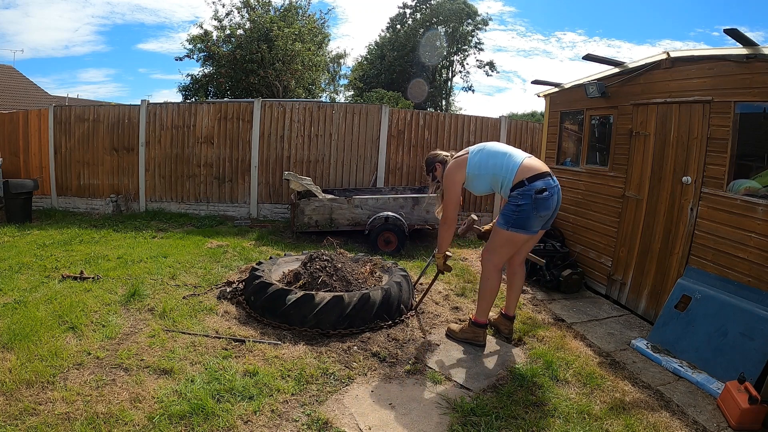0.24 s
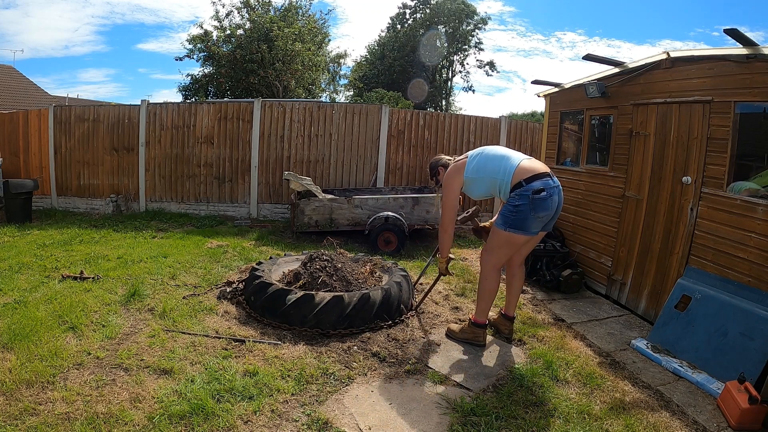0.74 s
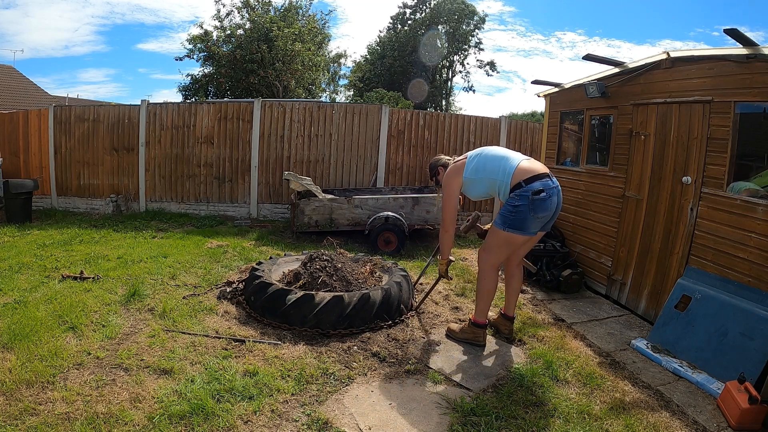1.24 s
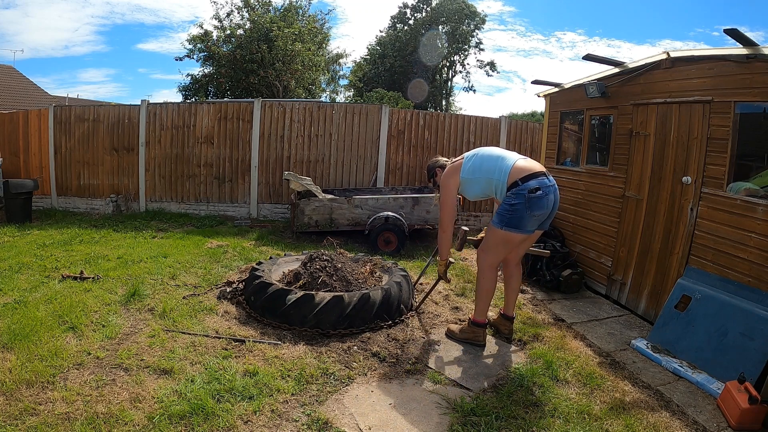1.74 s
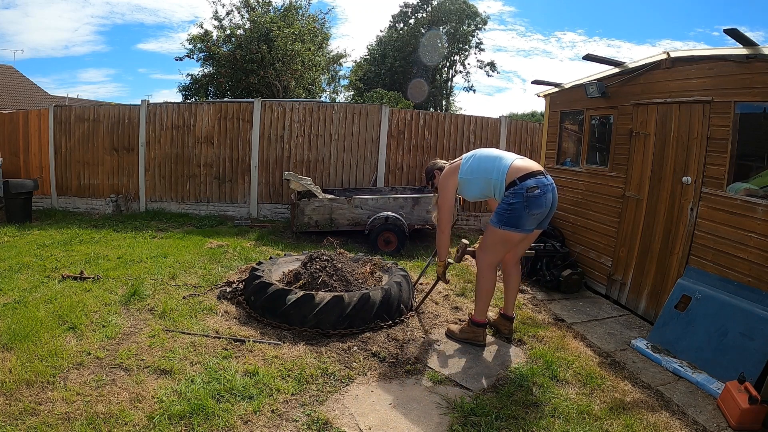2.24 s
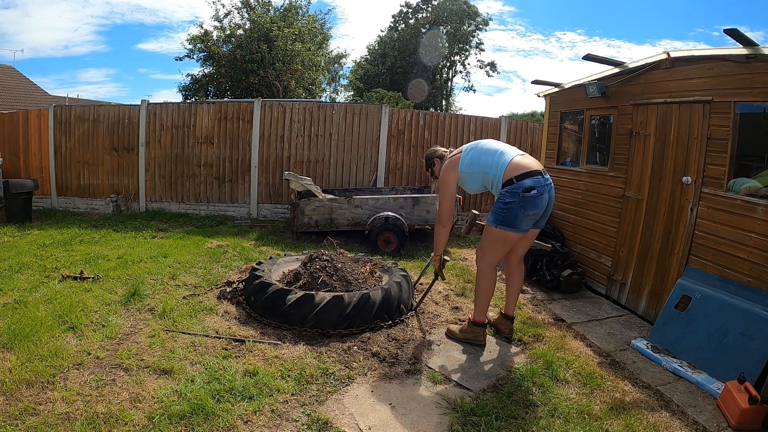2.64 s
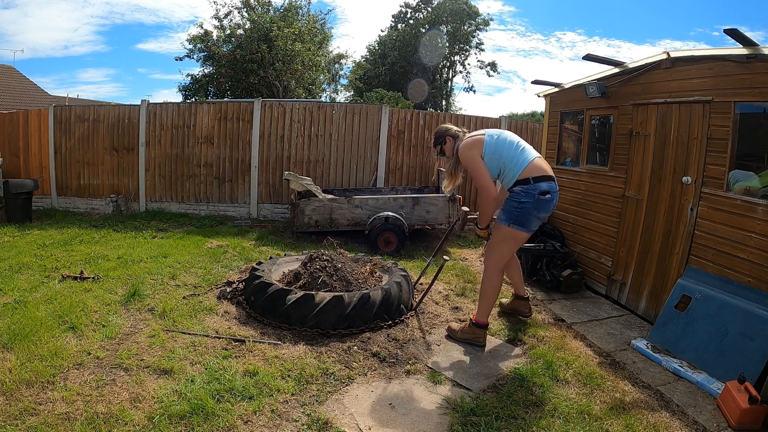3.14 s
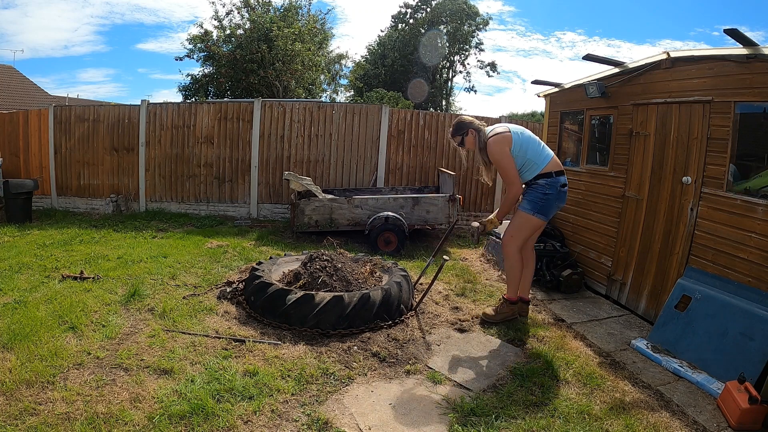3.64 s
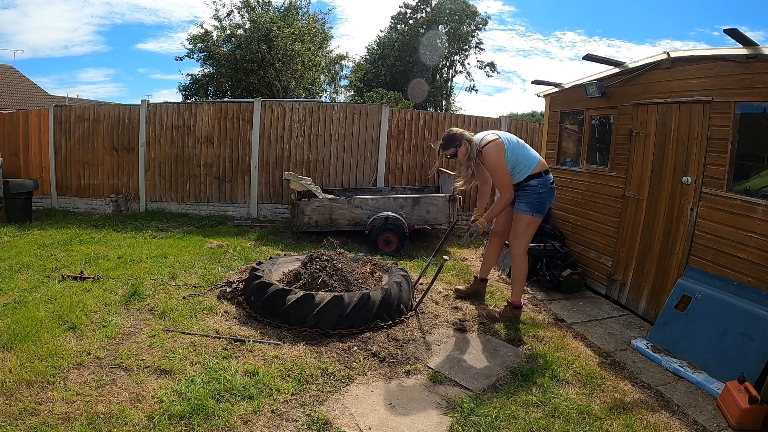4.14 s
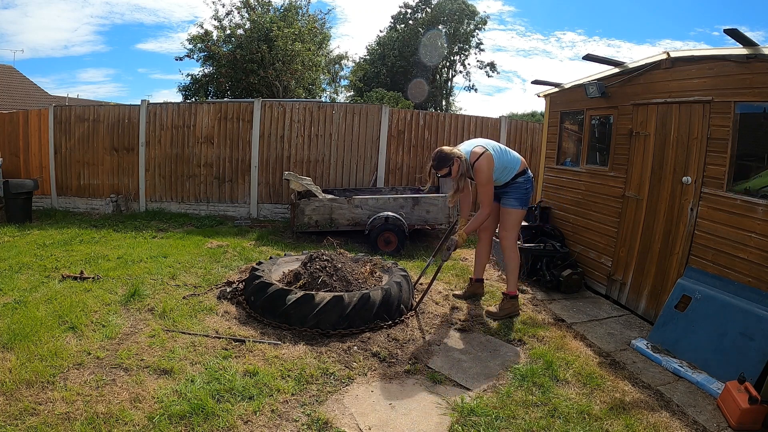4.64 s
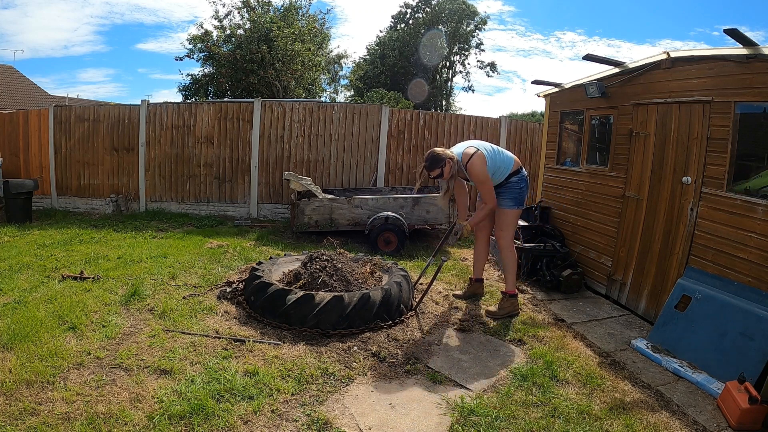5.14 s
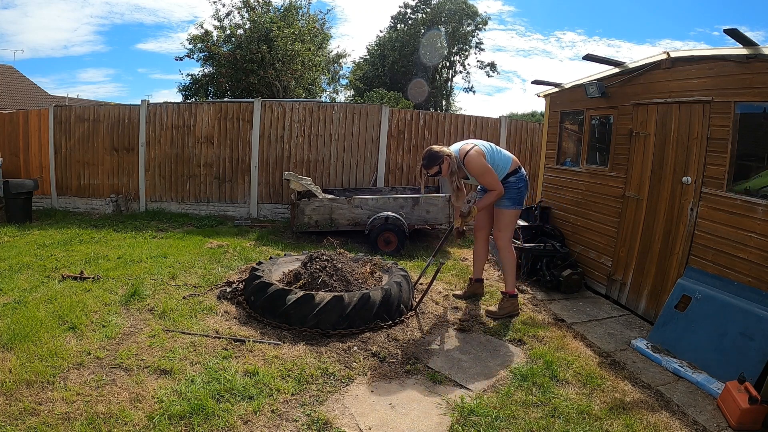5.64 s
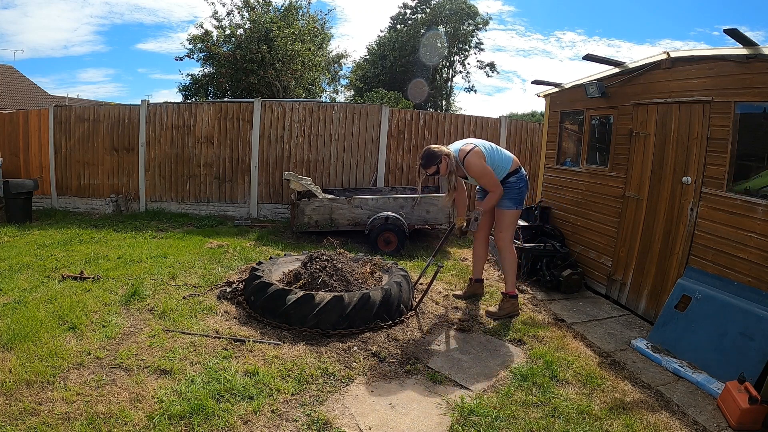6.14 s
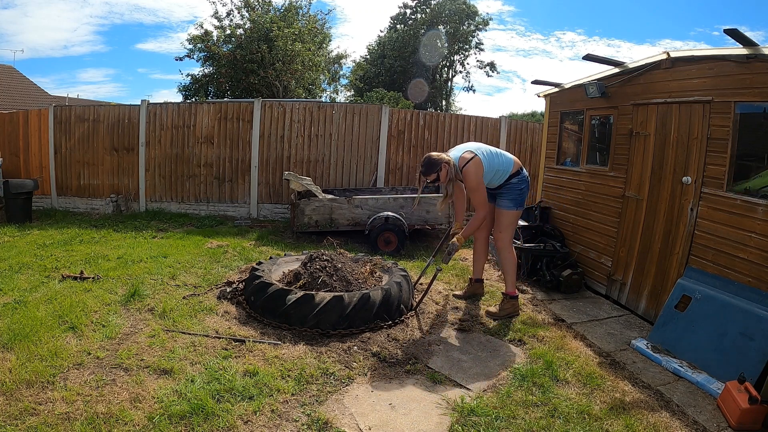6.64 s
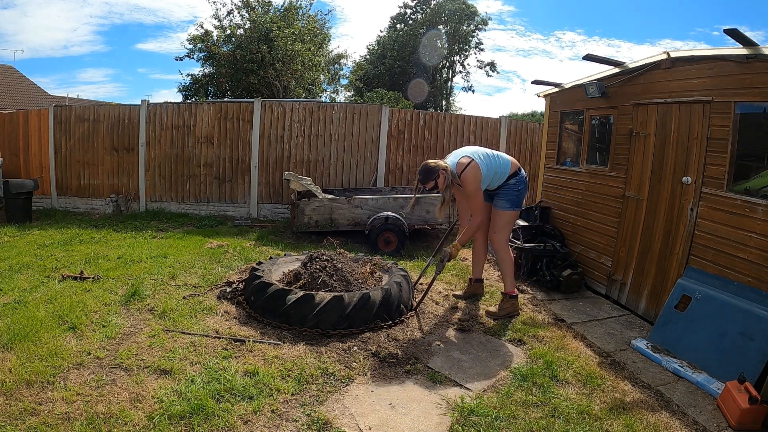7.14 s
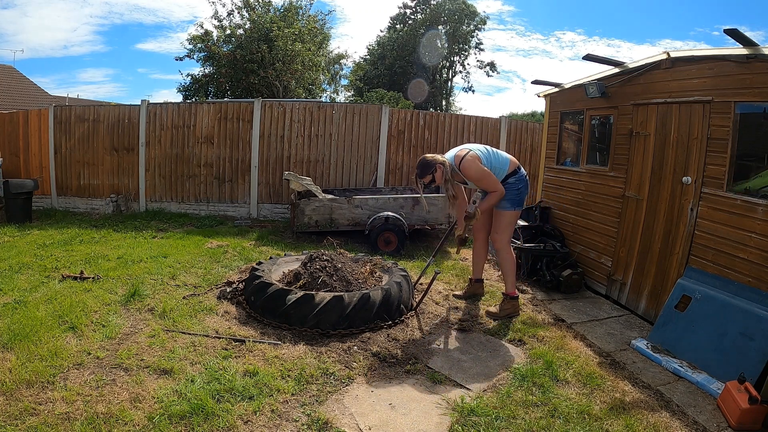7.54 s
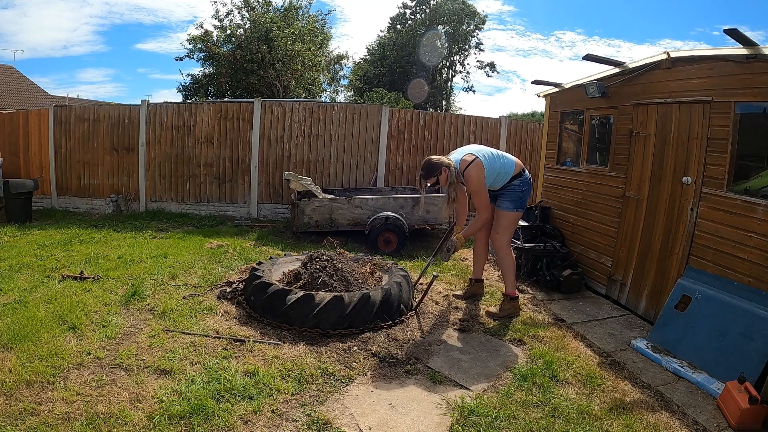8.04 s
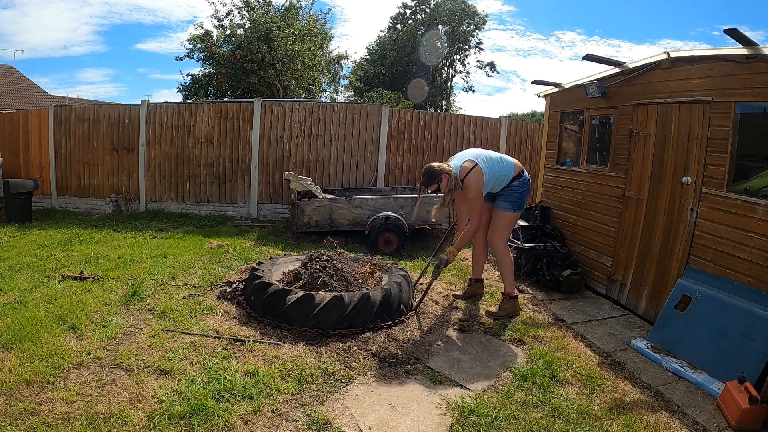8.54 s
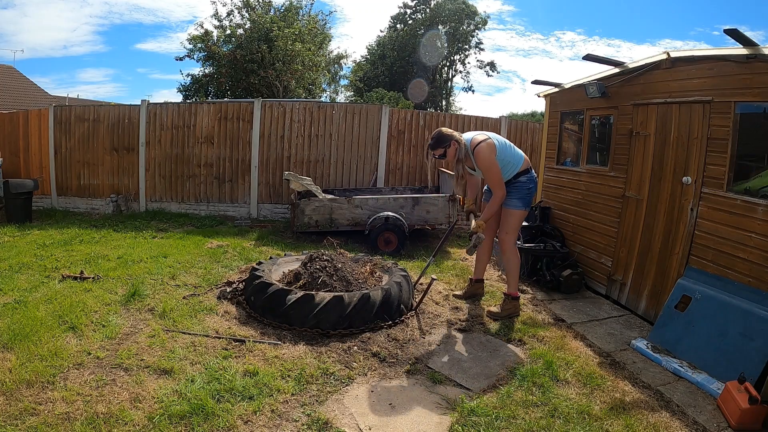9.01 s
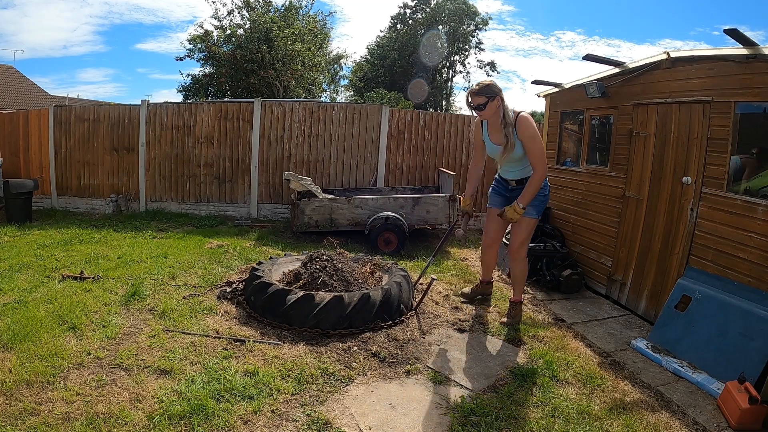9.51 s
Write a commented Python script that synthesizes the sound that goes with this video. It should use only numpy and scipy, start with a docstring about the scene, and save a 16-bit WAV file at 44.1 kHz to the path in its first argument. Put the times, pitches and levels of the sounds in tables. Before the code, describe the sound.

A small knock and faint cloth rustle come first over distant traffic hum and light leaves. Three hard hammer clangs on a steel stake follow, about 0.6 seconds apart. A pause brings wind buffeting, scuffs and rustling, then seven more steady blows. Each cracks and rings briefly, with slight ground thump and wall echoes. The microphone stands a few metres away in a fenced garden, its left side catching more wind.

```python
"""First a distant traffic hum and rustling leaves, with a small knock; then ten clangs of hammer on steel stake.
Blows are decaying modes of stake and head with noise for crack, soil and rattle; a fenced garden answers with
wall echoes and a diffuse wash. Shaped noise makes the traffic, leaves, clothes, boots and the gusts that buffet
the microphone ports, the left one most. A gain control turns the level down after every blow."""
import sys
import numpy as np
from scipy import signal
from scipy.fft import rfft, irfft, next_fast_len
from scipy.io import wavfile
from scipy.ndimage import uniform_filter1d, map_coordinates

SR = 44100
rng = np.random.default_rng(int(sys.argv[2]) if len(sys.argv) > 2 else 0)


def wav_out(sig):
    """Save sig, one row per channel (or a flat mono array), as 16-bit PCM at SR to the path in sys.argv[1]."""
    wavfile.write(sys.argv[1], SR, np.round(np.clip(np.atleast_2d(sig).T, -1, 1) * 32767).astype(np.int16))


N = 430855

# Spectra hold (frequency [Hz], relative level per Hz [dB]) unless other columns are listed.
# Far background: (time [s], engine rumble [dB], drone [dB], tyre roar [dB], leaves [dB]), before trims
BACKGROUND_LEVELS = [(0, -39.5, -49.5, -51, -66), (1, -40.5, -50, -51.5, -66),
                     (1.5, -41, -51.5, -53, -66.5), (2.2, -43, -49.5, -51, -65),
                     (2.7, -45, -53.5, -55.5, -65), (3.3, -38.5, -48.5, -52, -62),
                     (3.9, -39, -49, -51.5, -62.5), (4.6, -44, -50.5, -51, -63),
                     (5.2, -40.5, -53, -55, -67), (6, -45, -55.5, -53.5, -69), (6.8, -48, -56, -57.5, -71),
                     (7.6, -45, -58.5, -58.5, -71.5), (8.3, -45.5, -56, -54, -68.5),
                     (8.8, -41, -55, -55.5, -70), (9.2, -43, -52, -52.5, -70), (9.55, -41, -46.5, -48, -62),
                     (9.77, -41, -51.5, -48.5, -65)]
# Spectra of engine rumble, traffic drone, tyre roar and leaves
RUMBLE_SPECTRUM = [(12, -42), (20, -15), (50, -4), (65, 3.5), (82, -9.5), (102, -13), (170, -29.5),
                   (220, -54.5), (370, -120)]
DRONE_SPECTRUM = [(59, -25), (100, -1), (167, -7), (216, -9.5), (248, -13.5), (291, -6), (359, -14),
                  (836, -16), (900, -20), (1170, -41.5), (1980, -120)]
ROAD_SPECTRUM = [(470, -35.5), (800, -19.5), (929, 2), (1140, 0), (1450, -5), (1910, -9.5), (2180, -17),
                 (3000, -27), (3900, -49), (6600, -120)]
LEAF_SPECTRUM = [(1290, -27.5), (2200, -5), (2410, -3.5), (3290, -5), (3770, -5.5), (4660, -11),
                 (5980, -8.5), (7050, -13.5), (8550, -23.5), (11100, -53.5), (18800, -120)]
# Likeness of left and right in far sounds: (frequency [Hz], correlation [0-1])
STEREO_LIKENESS = [(60, 0.46), (250, 1), (600, 0.82), (1100, 0.76), (2000, 0.58), (4000, 0.077), (8000, .1)]
# A hum that swells once: (peak time [s], level [dB], rise [s], fall [s])
HUM_SWELL = (2.5, -60, 0.2, 1.7)
# Spectrum of that hum, near 300 Hz
HUM_SPECTRUM = [(230, -61.5), (280, -8.5), (305, 1.0), (335, -8), (400, -60)]

# Steady push of wind on the ports: (time [s], relative level [dB])
STEADY_WIND = [(2.3, -70), (2.7, -48.5), (3.3, -44), (4, -35), (4.5, -30), (5.1, -31), (5.6, -47),
               (6.2, -43), (6.6, -43), (6.9, -68.5)]
# Single gusts: (peak time [s], relative buffet [dB], relative puff [dB], nominal length [s])
GUSTS = [(2.875, -37, -58.5, 0.092), (3.078, -33, -55, 0.09), (3.205, -30, -58.5, .14),
         (3.418, -32, -59.5, 0.032), (3.693, -32.5, -56.5, .07), (3.806, -27, -39, 0.029),
         (3.89, -23, -40.5, 0.072), (4.077, -19, -35.5, 0.043), (4.128, -28, -33, .05),
         (4.343, -16.5, -26.5, 0.048), (4.42, -42, -45.5, 0.035), (4.561, -19, -32.5, 0.066),
         (4.682, -25, -47, .1), (4.94, -22, -29.5, .1), (5, -28.5, -23, .04), (5.059, -27, -35, .08),
         (5.124, -21.5, -32.5, .08), (5.403, -24, -57.5, .06), (5.518, -23, -33, .08),
         (5.827, -30.5, -43, 0.076), (5.965, -27, -47, 0.17), (6.227, -28, -53, 0.071),
         (6.44, -34.5, -51.5, .07), (6.608, -29, -60, .05)]
# Spectra of the deep buffeting and the sharper puffs
BUFFET_SPECTRUM = [(12, -30), (20, 5.5), (43, 7.5), (75, 6), (143, -2), (200, -22.5), (260, -43.5),
                   (440, -120)]
PUFF_SPECTRUM = [(82, -30.5), (140, 4), (235, -5.5), (297, -16), (356, -23.5), (624, -38.5), (800, -40.5),
                 (1040, -66), (1760, -120)]
# Spectrum of the upper reach of the hardest puffs
REACH_SPECTRUM = [(120, -94.5), (200, -11.5), (330, 8.5), (550, -9.5), (800, -28.0), (1500, -120)]
STEADY_PUFF_DB = -20  # steady puffing against the steady push
GUST_RISE_SHARE = .45  # share of a gust's length spent rising

# Swishes of clothes: (peak time [s], level [dB], rise [s], fall [s])
CLOTH_SWISHES = [(.264, -63, .01, .012), (.348, -61, 0.13, .14), (3.396, -57.5, .07, .03),
                 (3.606, -53.5, 0.24, .18), (3.828, -57.5, 0.067, .07), (3.904, -56, .03, .1),
                 (4.204, -64.5, 0.023, .17), (9.2, -62.5, .1, .2), (9.42, -58.5, 0.62, .03)]
# Spectrum of a swish
SWISH_SPECTRUM = [(1500, -64), (2500, 0), (3660, 2), (4450, -3.5), (5960, -1.5), (7750, -13), (9000, -19),
                  (13500, -25), (15500, -67)]
# Small knocks and scuffs: (time [s], level [dB], low tones relative to it [dB], tick decay t60 [s])
TAPS = [(0.263, -35, -6.5, 0.012), (3.574, -42.5, -5, 0.022), (3.825, -34, -22, 0.011),
        (3.905, -31.5, 11, 0.021)]
# Spectrum of a tick
TAP_SPECTRUM = [(880, -27.5), (1500, -0.5), (2810, -10.5), (3150, -6), (4770, -21), (5690, -12),
                (8550, -33), (11100, -61), (18800, -120)]
# Soft boot falls: (time [s], level [dB], width [s])
STEPS = [(.575, -45.5, .03), (.89, -48, 0.016), (.97, -45, 0.022), (1.921, -41.5, 0.014),
         (6.845, -55, 0.015)]
# Spectrum of a boot on grass
TREAD_SPECTRUM = [(120, -31), (250, -11.0), (400, 1.0), (700, -6), (1600, -12.5), (4000, -120)]

# The stake stands to the right: (frequency [Hz], left minus right [dB], left lead [rad])
PORT_DIFFERENCE = [(100, 0, 0), (1300, -3, -.35), (2300, 0, -.7), (3800, -1, -1.1), (4400, -4, -1.5),
                   (5700, -8, -1.1), (7000, 0, -1), (8400, 1, -1.5), (12600, -2, -2)]
# Shed, fences, a far house: (delay [s], level [dB], smear t60 [s], dull above [Hz])
WALLS = [(0.016, -4, 0.0013, 4160), (0.0234, -13.5, 0.0024, 6110), (0.032, -27, .004, 4965),
         (.098, -23, 0.026, 1946), (.112, -25.5, 0.051, 1900), (.147, -29.5, 0.0086, 3020)]
# Diffuse garden wash: (frequency [Hz], decay t60 [s])
YARD_DECAY = [(150, .15), (1000, 0.42), (2500, 0.35), (4000, 0.39), (7000, 0.35), (12000, 0.3)]
# Blows: (time [s], level [dB]), then parts relative to it: (thud [dB], stake clank [dB], stake ring [dB],
# stake overtone [dB], head ring [dB], bright ring [dB], click [dB], thin head ring [dB])
BLOWS = [(1.035, -1.5, -16.5, -20.5, -22.5, -17, -11, -20, -54.5, -38),
         (1.6307, -0.5, -18, -24, -20.5, -19.5, -16, -25, -50, -40.5),
         (2.2343, -1, -15.5, -22, -17, -19.5, -12, -16, -45, -41),
         (4.6807, -1.5, -22, -20, -16, -23.5, -10, -13, -43, -45),
         (5.3145, -1.5, -25.5, -28, -10.5, -16, -11, -13.5, -32.5, -42.5),
         (5.9373, -1.5, -25, -22.5, -9.5, -14, -11.5, -15.5, -38, -40.5),
         (6.5931, -2, -57, -24, -13.5, -23, -9.5, -13.5, -22, -40.5),
         (7.2626, -3.5, -22.5, -18.5, -14.5, -18, -8.5, -21, -48, -42),
         (7.9405, -2, -26.5, -19, -17.5, -22.5, -9, -13.5, -68, -43),
         (8.628, 2, -25.5, -18.5, -27, -23.5, -14.5, -19.5, -40.5, -41.5)]
# Modes of stake and head: (frequency [Hz])
STEEL_HZ = [1130, 1345, 1560, 1690, 2175, 2245, 2560, 3222, 3335, 3772, 3812, 4335, 4465, 5705, 6580, 7070,
            7590]
# How those modes ring before the blow tilts them: (relative level [dB], decay t60 [s])
STEEL_RING = [(3.5, 0.028), (0, 0.03), (4, 0.012), (5, 0.014), (0.5, 0.032), (-5, 0.045), (-8, 0.029),
              (7, 0.035), (-6, 0.052), (1.5, 0.1), (-2.5, 0.094), (0, 0.016), (-2, 0.049), (4.5, 0.019),
              (-9, .03), (-0.5, 0.029), (-6.5, 0.089)]
# Long, thin modes of the hammer head: (frequency [Hz], relative level [dB], decay t60 [s])
THIN_HEAD_MODES = [(3795, 7, .42), (8362, -6, .5), (8472, -6, .33), (10070, -13, .28), (11420, -10, .2),
                   (12595, -8, .28)]
# Thump modes of the ground: (frequency [Hz], relative level [dB], decay t60 [s])
SOIL_MODES = [(128, -1, .11), (163, 2, 0.067), (228, -9, 0.13)]
# Spectra of the crack, the loose earth and the stake's rattle in its hole
CRACK_SPECTRUM = [(150, -23.5), (250, -3), (988, -10.5), (2910, -4), (3680, -15.5), (4140, -4),
                  (4800, -6.5), (5650, -11), (7270, -13), (8550, -19), (11100, -56), (18800, -120)]
EARTH_SPECTRUM = [(50, -90), (100, -0.5), (170, 2), (280, -4.5), (400, -25), (900, -94)]
RATTLE_SPECTRUM = [(100, -93), (280, -0.5), (500, -4.5), (780, -16), (1300, 1), (2200, -4.5), (4500, -19.5),
                   (7500, -22.5), (9500, -88)]
# Spectrum of the high click
CLICK_SPECTRUM = [(8300, -62.0), (9000, 0.5), (14500, -7.5), (16000, -32)]
CRACK_WASH_DB = 3.5  # extra crack fed into the wash, making it denser

TOP_HZ = 15800  # band limit


def amp(db):
    """Amplitude of a level in dB."""
    return np.exp(np.asarray(db) * (np.log(10) / 20))


def unit(x):
    """Scale to rms 1."""
    return x / np.sqrt(np.mean(x ** 2) + 1e-20)


def along(points, hz):
    """Read (Hz, value) points on a log frequency axis."""
    f, value = np.transpose(points)
    return np.interp(np.log(hz + 1), np.log(f + 1), value)


def curves(rows):
    """One value per sample for each column after the time."""
    s, *columns = np.transpose(rows)
    return [np.interp(np.arange(N) / SR, s, column) for column in columns]


def wobble(rate, size=N):
    """A smooth random curve, rate knots a second."""
    coarse = np.arange(0, size + 64, 64)
    knots = rng.standard_normal(int(size * rate / SR) + 4)
    smooth = map_coordinates(knots, [coarse * rate / SR])
    return np.interp(np.arange(size), coarse, smooth)


def swells(peak_s, db, rise_s, fall_s):
    """Gain of overlapping swells, each 20 dB down one rise before and one fall after its peak."""
    coarse = np.arange(0, N + 32, 32)
    late = coarse[:, None] / SR - peak_s
    drop_db = 20 * np.where(late < 0, -late / rise_s, late / fall_s)
    gain = np.sqrt(np.sum(amp(db - drop_db) ** 2, axis=1))
    return np.interp(np.arange(N), coarse, gain)


def filtered(x, response):
    """Shape x by a response over frequency."""
    n = x.shape[-1]
    padded = next_fast_len(n + 4096, True)
    spectrum = rfft(x, padded) * response(np.fft.rfftfreq(padded, 1 / SR))
    return irfft(spectrum, padded)[..., :n]


def noise(spectrum, shape):
    """Coloured noise of rms 1."""
    return unit(filtered(rng.standard_normal(shape), lambda hz: amp(along(spectrum, hz))))


def rush(spectrum, patchy_db):
    """Wide stereo noise of rms 1, with random gain patches in time and frequency."""
    z = signal.stft(rng.standard_normal((2, N)), nperseg=512)[2]
    patches = uniform_filter1d(rng.standard_normal(z.shape[1:]), size=6, axis=0)
    patches = uniform_filter1d(patches, size=12, axis=1)
    pair = signal.istft(z * amp(patchy_db * unit(patches)), nperseg=512)[1][:, :N]

    def mid_side(hz):
        # this split of mid and side gives the wanted left-right correlation
        turn = np.arccos(np.clip(along(STEREO_LIKENESS, hz), -1, 1)) / 2
        return amp(along(spectrum, hz)) * np.array([np.cos(turn), np.sin(turn)])

    mid, side = filtered(pair, mid_side)
    return unit(np.array([mid + side, mid - side]))


def ring(hz, db, t60, t, attack=0.00082):
    """One struck mode: a decaying sine, silent after twice its decay time."""
    live = t[t < 2 * t60]
    level = np.broadcast_to(db, t.shape)[:len(live)] - 60 * live / t60
    tone = amp(level) * (1 - np.exp(-live / attack)) * np.sin(2 * np.pi * hz * live)
    return np.pad(tone, (0, len(t) - len(live)))


def distance():
    """Slowly varying noise bands: engine rumble, traffic drone, a passing hum, tyre roar and leaves."""
    rumble_db, drone_db, road_db, leaves_db = curves(BACKGROUND_LEVELS)
    rumble = amp(rumble_db + 4.0 + 1.1 * wobble(4) + 0.58 * wobble(32)) * noise(RUMBLE_SPECTRUM, N)
    drone = amp(drone_db + wobble(4.7)) * rush(DRONE_SPECTRUM, patchy_db=1.0)
    # leaves sit slightly right, tyres slightly left
    leaves = amp(leaves_db + 0.87 * wobble(9)) * rush(LEAF_SPECTRUM, patchy_db=2.0) * amp([[-.5], [.5]])
    road = amp(road_db + 0.27 * wobble(5)) * rush(ROAD_SPECTRUM, patchy_db=1.87) * amp([[.6], [-.6]])
    hum = swells(*np.transpose([HUM_SWELL])) * noise(HUM_SPECTRUM, N)
    return rumble + drone + leaves + road + hum


def wind():
    """Turbulence at the ports: separate buffets lean left; shared puffs lie a quarter cycle apart."""
    s, buffet_db, puff_db, length = np.transpose(GUSTS)
    rise, fall = 2 * GUST_RISE_SHARE * length, 2 * (1 - GUST_RISE_SHARE) * length
    now = np.arange(N) / SR
    blowing = (now > STEADY_WIND[0][0]) * (now < STEADY_WIND[-1][0])
    steady = amp(curves(STEADY_WIND)[0]) * blowing
    push = np.hypot(steady * amp(3.4 * wobble(4.5)), swells(s, buffet_db, rise, fall))
    steady_puff = steady * amp(STEADY_PUFF_DB + 7.3 * wobble(15))
    sharp = np.hypot(steady_puff, swells(s, puff_db, .8 * rise, 0.87 * fall))

    flutter = amp(0.5 * np.array([wobble(9.8), wobble(20)]))
    buffet = push * amp([[4], [-8]]) * unit(noise(BUFFET_SPECTRUM, (2, N)) * flutter)
    puff = sharp * amp(4.5) * unit(noise(PUFF_SPECTRUM, N) * amp(1.1 * wobble(30)))
    # the hardest puffs reach higher
    reach = sharp ** 1.67 * amp(9.5) * noise(REACH_SPECTRUM, N)
    quarter = np.exp([[-.25j * np.pi], [.25j * np.pi]])
    return buffet + filtered(puff + reach, lambda hz: quarter * np.ones_like(hz))


def cloth():
    """Clothes swish as the worker shifts: fluttering wide noise under swells."""
    flutter = amp(1.1 * wobble(29))
    return swells(*np.transpose(CLOTH_SWISHES)) * flutter * rush(SWISH_SPECTRUM, patchy_db=0.0)


def taps():
    """Tool knocks and scuffs: a noise tick over two short low modes."""
    out, t = np.zeros(N + SR), np.arange(SR // 8) / SR
    for s, db, low_db, t60 in TAPS:
        envelope = amp(-5.0 - 60 * t / t60) * (1 - np.exp(-t / 0.00038))
        tick = envelope * noise(TAP_SPECTRUM, len(t))
        low = ring(520, low_db, 0.02, t) + ring(300, low_db - 11.5, 0.042, t)
        out[round(s * SR):][:len(t)] += amp(db) * (tick + low)
    return out[:N]


def boots():
    """Soft boot falls on the grass: bell-shaped bursts of low noise."""
    now = np.arange(N) / SR
    tread = sum(amp(db) * np.exp(-((now - s) / width) ** 2) for s, db, width in STEPS)
    return tread * noise(TREAD_SPECTRUM, N)


def ports(x):
    """A sound from the stake at both ports: level and phase differ with frequency."""
    hz, db, lead = np.transpose(PORT_DIFFERENCE)
    # each port takes half of the level and phase difference
    half = lambda f: np.interp(f, hz, db * np.log(10) / 40 + .5j * lead)
    return filtered(x, lambda f: np.exp([half(f), -half(f)]))


def wall_echoes(t):
    """Impulse response of shed, fences and far house: delayed, smeared, dulled reflections."""
    echoes = np.zeros(len(t))
    for late, db, smear_s, dull_hz in WALLS:
        # uneven boards smear the reflection
        smear = rng.standard_normal(len(t)) * amp(-60 * np.abs(t - late) / smear_s) * (t >= late)
        echo = amp(db) * smear / np.linalg.norm(smear)
        echoes += filtered(echo, lambda f: 1 / (1 + 1j * f / dull_hz) ** 2)
    return echoes


def garden_wash(t):
    """Diffuse stereo impulse response: noise that swells late while each band decays."""
    hz, when, z = signal.stft(rng.standard_normal((2, len(t))), SR, nperseg=256)
    swell = 0.22 + 0.58 * np.clip(when / 0.14, 0, 1) ** 2
    decay = amp(-60 * when / along(YARD_DECAY, hz)[:, None])
    wash = signal.istft(z * swell * decay, SR, nperseg=256)[1][:, :len(t)]
    return amp(-14.5) * wash / np.linalg.norm(wash[0])


def answer(sound, extra_crack, t):
    """The garden's reply to one blow: wall echoes and a diffuse wash, by convolution."""
    diffuse = signal.fftconvolve((sound + extra_crack)[None], garden_wash(t), axes=1)[:, :len(t)]
    echoes = ports(wall_echoes(t[:SR // 4]))
    return diffuse + signal.fftconvolve(sound[None], echoes, axes=1)[:, :len(t)]


def hammer():
    """Each blow cracks, rings stake and head, and thumps the soil; the garden answers."""
    out, t = np.zeros((2, N + SR)), np.arange(SR // 2) / SR
    for (s, db, thud_db, clank_db, stake_db, over_db,
         head_db, bright_db, click_db, thin_db) in BLOWS:
        # (frequency [Hz], level [dB]): how this blow excites the modes
        tilt = [(1500, clank_db), (2200, stake_db), (3200, over_db),
                (3790, head_db), (4400, -23), (5700, bright_db)]
        # small random level [dB] and tuning [ratio] offsets
        chance = rng.normal(0, [1, .003], (len(STEEL_RING), 2))
        steel = np.zeros(len(t))
        for hz, (level, t60), (more_db, detune) in zip(STEEL_HZ, STEEL_RING, chance):
            steel += ring(hz * (1 + detune), level + along(tilt, hz) + more_db, t60, t)
        # the head turns as it is lifted, so its thin tones flicker
        for hz, level, t60 in THIN_HEAD_MODES:
            flicker_db = 3 * wobble(30, size=len(t))
            steel += ring(hz, level + thin_db + flicker_db, t60, t)

        crack_envelope = amp(-11.0 - 60 * t / 0.016) * (1 - np.exp(-t / 0.00084))
        crack = crack_envelope * noise(CRACK_SPECTRUM, len(t))
        soil = -sum(ring(hz, level + thud_db, t60, t, attack=0.0012) for hz, level, t60 in SOIL_MODES)
        earth_envelope = amp(thud_db - 3.5 - 60 * t / 0.12) * (1 - np.exp(-t / 0.0049))
        soil += earth_envelope * noise(EARTH_SPECTRUM, len(t))
        # the stake shudders in its hole
        rattle = amp(-21.5 - 60 * t / 0.076) * noise(RATTLE_SPECTRUM, len(t))
        sound = amp(db) * (steel + crack + soil + rattle)
        click = amp(db + click_db - 3.0 - 60 * t / 0.012) * noise(CLICK_SPECTRUM, len(t))

        extra_crack = amp(db + CRACK_WASH_DB) * crack
        out[:, round(s * SR):][:, :len(t)] += ports(sound + click) + answer(sound, extra_crack, t)
    return out[:, :N]


def scene():
    """Layer the background, the wind, the worker's small sounds and the blows."""
    return distance() + wind() + cloth() + taps() + boots() + hammer()


def record(dry):
    """Gain follows power above 500 Hz: down soon after a blow, easing back; then the band limit."""
    t = np.arange(2 * SR) / SR
    power = filtered(dry.mean(axis=0), lambda hz: hz > 500) ** 2
    # the detector builds up, then forgets [time constants in s]
    memory = (1 - np.exp(-t / 0.086)) * np.exp(-t / 0.14)
    loud = np.abs(signal.fftconvolve(power, memory / (0.051 * SR))[:N])
    gain = (1 + loud / amp(-32) ** 2) ** -.12
    return filtered(dry * gain, lambda hz: hz < TOP_HZ)


dry = scene()
out = record(dry)
wav_out(out)
```